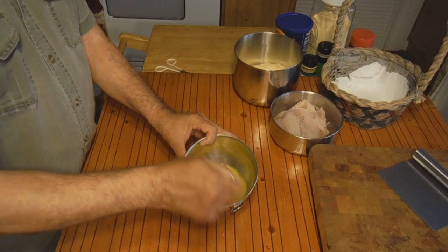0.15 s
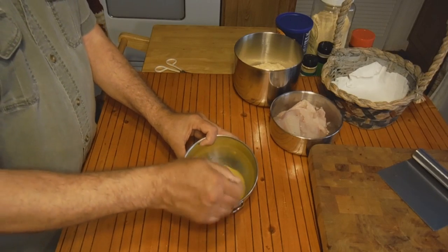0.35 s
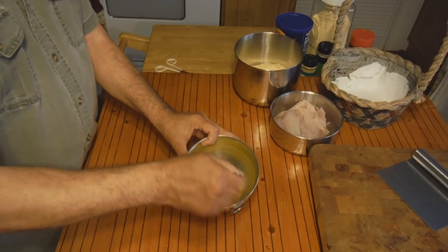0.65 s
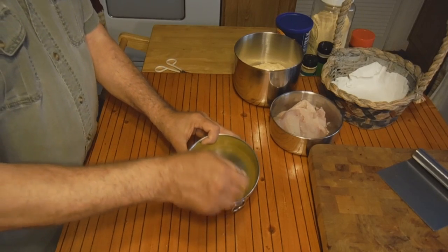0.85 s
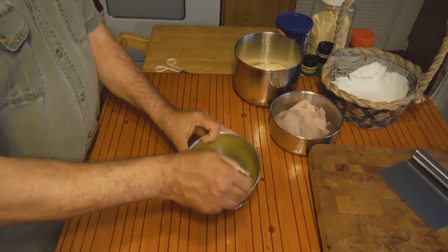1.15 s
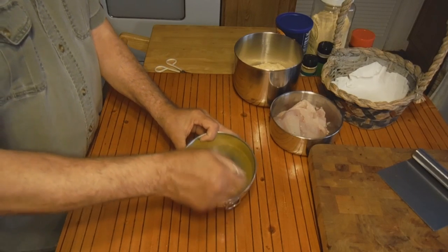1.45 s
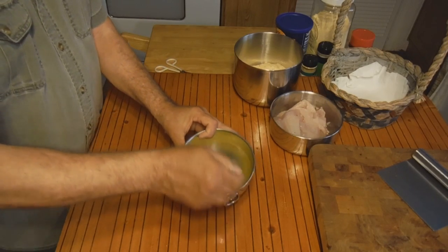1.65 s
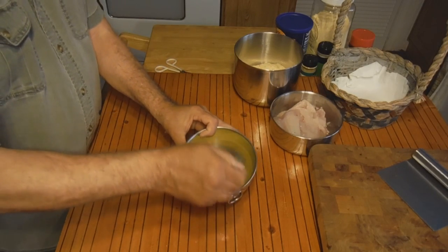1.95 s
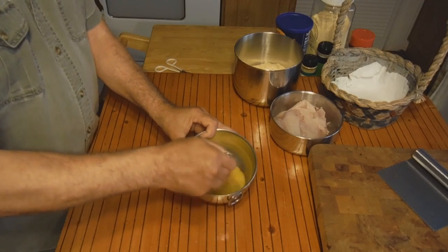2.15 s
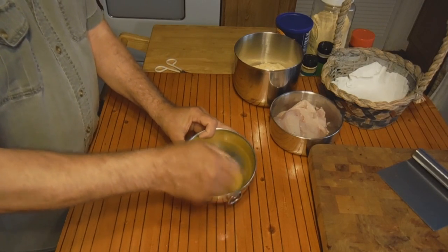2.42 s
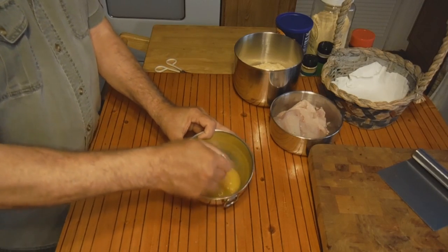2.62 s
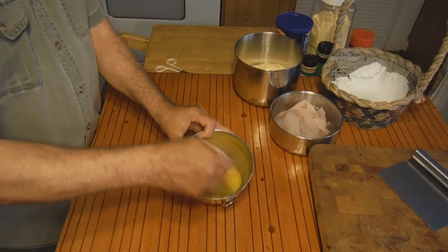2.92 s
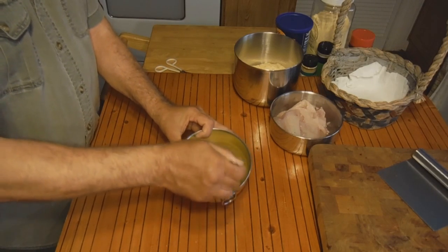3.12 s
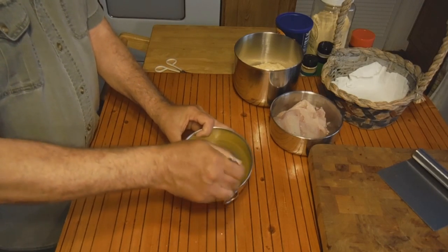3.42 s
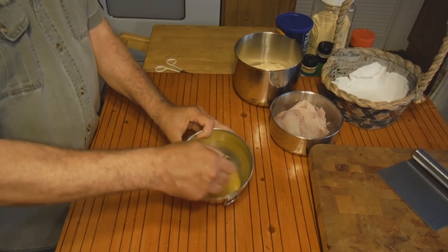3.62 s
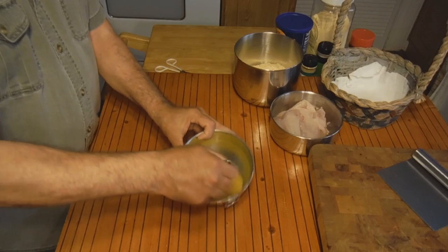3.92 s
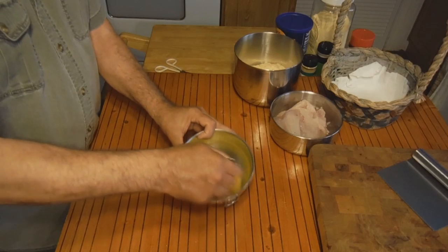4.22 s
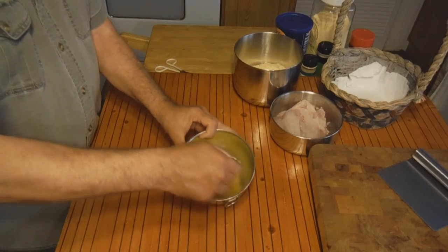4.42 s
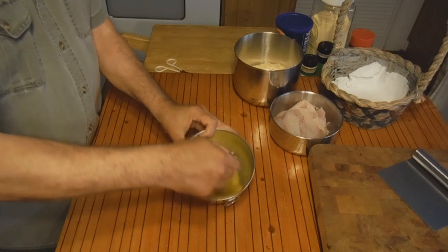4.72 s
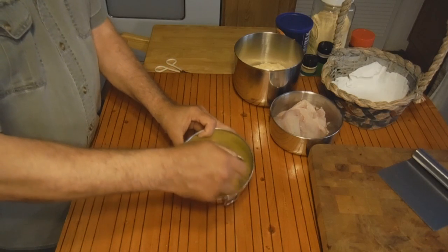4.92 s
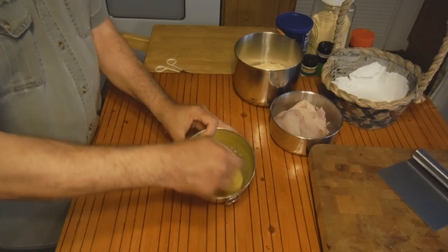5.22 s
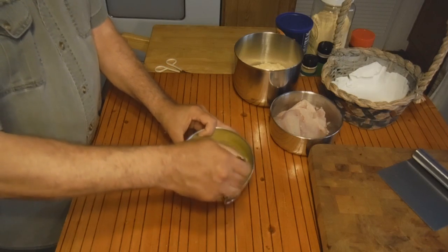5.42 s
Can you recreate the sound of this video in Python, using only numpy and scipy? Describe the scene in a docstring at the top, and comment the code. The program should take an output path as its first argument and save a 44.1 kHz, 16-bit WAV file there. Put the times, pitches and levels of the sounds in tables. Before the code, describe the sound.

Eggs are beaten with a metal fork in a small steel bowl on a wooden table, already in full swing at 0 s and continuing to the end at about 5.5 s. Around six times a second the tines hit and skid along the wall: a bright, short, rough clank with a choked mid-high ring, followed by two lighter, wet taps. At first the sound is drier and more metallic, with uneven force; strokes near 1.8 s and 5.1 s almost drop out. Low soft bumps of bowl on table fall around 0.7-1.2 s, strongest at 1.0 s, and again at 4.05 and 4.35 s. From 1.5 s the egg sloshes more, wettest at 2.6-3.4 s, with plops, tiny bubbles, spatter and a hollow hum from the bowl's floor; it eases, then thickens again towards the end. Close microphone, small kitchen, short dense echoes, faint steady air hush.

```python
"""Beating eggs in a steel bowl

Eggs are beaten with a fork in a small steel bowl held on a wooden kitchen table.
About six times a second the tines strike and skid along the wall (noise filtered by the bowl's modes),
then tap twice more on their way round through the egg (ringing tines, wet plops of banded noise and bubbles).
The deeper the fork digs, the more the egg sloshes (crowded noise bursts) and the bowl's floor hums (damped
sines); the table thuds now and then (a push and low modes), and a small room answers with dense echoes."""
import sys
import numpy as np
from scipy import signal
from scipy.fft import rfft, irfft
from scipy.io import wavfile

SR = 44100
rng = np.random.default_rng(int(sys.argv[2]) if len(sys.argv) > 2 else 0)


def waveform_to_disk(signal):
    """Save audio, clipped to [-1, 1], as 16-bit WAV at the path in sys.argv[1]."""
    frames = np.transpose(np.atleast_2d(signal))
    scaled = np.clip(frames, -1, 1) * 32767
    samples = np.round(scaled).astype(np.int16)
    wavfile.write(sys.argv[1], SR, samples)


N = 244971

# the fork strikes the wall, one row a stroke: (time [s], level [dB], wall ring relative to that level [dB])
STRIKES = [(0.1251, -8, -10.5), (0.298, -7.5, -11.5), (0.4719, -20, -6.5), (0.6345, -13, -4),
           (0.8021, -18, -4.5), (0.952, -11.5, -6.5), (1.114, -13.5, -7), (1.2787, -10.5, -4.5),
           (1.4357, -8.5, -9), (1.598, -9.5, -14), (1.7689, -42, -7), (1.9132, -19.5, -36),
           (2.064, -13.5, -9), (2.2046, -6.5, -9.5), (2.3633, -21.5, -7.5), (2.4925, -5, -9),
           (2.6502, -14.5, -5.5), (2.7991, -13, -6.5), (2.9371, -6, -9), (3.0978, -6.5, -19),
           (3.244, -4, -23), (3.3956, -6.5, -17.5), (3.532, -7.5, -8), (3.682, -8, -9.5),
           (3.8263, -8, -8.5), (3.9738, -10, -10), (4.1263, -6, -14.5), (4.2863, -8, -5.5),
           (4.439, -6.5, -9), (4.5978, -10.5, -3.5), (4.7513, -7.5, -5.5), (4.9121, -6, -9.5),
           (5.0767, -35, 4), (5.2243, -8, -5.5), (5.3929, -9, -8.5)]
# taps that stand out as the fork goes round:
# (time [s], level [dB], wet plop relative to that level [dB], plop pitch [Hz])
TAPS = [(0.0098, -15.5, -5.5, 2174), (0.1807, -15, -8, 1860), (0.3415, -15.5, -9, 1970),
        (0.3686, -18, -4, 1804), (0.509, -20, -9.5, 2130), (0.5432, -21, -9.5, 2230),
        (0.6688, -17, -8.5, 1900), (0.7084, -19.5, -14, 2250), (0.8348, -18.5, -4, 1660),
        (0.8596, -17.5, -1, 1910), (0.9903, -23, 1, 1860), (1.0169, -20.5, -5, 2485),
        (1.1439, -19, -2.5, 2000), (1.186, -20.5, -9, 2280), (1.3066, -21, -2.5, 1700),
        (1.3454, -26, -9, 1800), (1.4741, -21.0, -3.5, 1600), (1.5103, -18, -4, 2186),
        (1.6362, -18, -8.5, 1780), (1.6642, -12.5, -12, 1930), (1.7031, -23.5, -35, 1850),
        (1.7869, -24.5, -5.5, 1690), (1.8186, -13, -11.5, 1705), (1.94, -22.5, -12, 1980),
        (1.9723, -13.5, -8, 1726), (2.0986, -18.5, -8, 2180), (2.1206, -12.5, -4.5, 1890),
        (2.2605, -18.5, -7, 2070), (2.2719, -15.5, -12, 2200), (2.3787, -22.5, -6, 2140),
        (2.539, -14, -9, 1870), (2.5639, -15.5, -0.5, 1957), (2.6816, -21.5, -8, 2070),
        (2.7117, -19, -2.5, 1960), (2.836, -21, -0.5, 2340), (2.86, -15, -1, 1914), (2.9883, -13, -9, 1990),
        (3.0108, -13.5, -3.5, 1895), (3.1525, -10.5, -6.5, 1670), (3.2829, -17.5, -8, 2140),
        (3.3019, -11.5, -15, 2050), (3.432, -15.5, -11.5, 2200), (3.4595, -18.5, -13, 2070),
        (3.5662, -17, -8, 1970), (3.7264, -16.5, -5, 1840), (3.869, -16, -4.5, 1900),
        (4.0225, -17.5, 0.5, 1995), (4.0603, -16.5, -7, 1863), (4.1725, -18.0, -2.5, 1640),
        (4.1953, -17, -3.5, 1620), (4.327, -20, -0.5, 1900), (4.4788, -12.5, -6.5, 1910),
        (4.6366, -22, -1.5, 1882), (4.7941, -14.5, -9, 1430), (4.829, -18, -4, 2100),
        (4.9841, -19, 1.5, 1797), (5.1016, -22.0, -3.5, 2070), (5.1471, -23, -8, 1820),
        (5.272, -21, -0.5, 1730), (5.3066, -20.5, -13, 1780), (5.439, -22, 0.5, 1975),
        (5.4675, -17, -9, 1955)]
# the bowl rocks on the table: (time [s], level [dB])
THUDS = [(0.2255, -30.5), (0.7183, -29), (0.880, -24.5), (1.026, -15), (1.192, -20), (4.0502, -14),
         (4.360, -17)]
# how deep the fork digs into the egg: (time [s], depth relative to full depth [dB])
FORK_DEPTH = [(0, -19.5), (1.45, -8), (1.8, -5), (2.15, -6.5), (2.35, -12.5), (2.55, -3.5), (3.3, -1),
              (3.6, -11), (4.25, -10.5), (4.7, -8.5), (5.0, -7.5), (5.55, -5)]
# spectrum of steel on steel: (frequency [Hz], level [dB])
STEEL_SPECTRUM = [(40, -37), (250, -22), (480, -8.5), (720, -15.5), (1300, -13.5), (2200, -8), (3100, -6.5),
                  (4600, 1), (6400, 4), (7600, 3), (9500, 2), (12000, 0.5), (14000, -8.5), (16000, -14.5)]
# modes of the bowl, damped by hand and egg: (frequency [Hz], level [dB], t60 [s])
BOWL_MODES = [(893, 11.5, 0.097), (1266, 10, 0.12), (1840, 16, 0.028), (2260, -11, 0.57), (2648, 5, 0.085),
              (3520, 1.5, 0.062), (3762, 3, 0.053), (4320, -6, 0.037), (4507, -4.5, 0.017),
              (4740, -2, 0.067), (5320, -9.5, 0.022), (5650, -8, 0.011), (6350, -16, 0.017),
              (6290, -3.5, 0.093), (8580, -1, 0.036), (9030, 6, 0.014), (9660, 2, 0.02),
              (10800, -20, 0.0067), (11540, -14.5, 0.014)]
# modes of the table: (frequency [Hz], level [dB], t60 [s])
TABLE_MODES = [(69.3, -7, 0.2), (94.7, -1.5, 0.085), (149, 0.5, 0.11), (193.7, -10.5, 0.19),
               (214.7, 0.5, 0.082), (289, -25, 0.59), (381.6, -11.5, 0.12), (447, -24, 0.58)]
# modes of the bowl's floor under the egg: (frequency [Hz], level [dB], t60 [s])
FLOOR_MODES = [(440, -2.5, 0.13), (497, 1, 0.12), (713, -7, 0.036), (899.7, 3.5, 0.15)]
# spectrum of the wet egg: (frequency [Hz], level [dB])
EGG_SPECTRUM = [(100, -21.5), (300, 2.5), (450, -11.5), (900, 5.5), (1600, -10), (2400, 2), (3300, -4.5),
                (6000, 12), (10000, 11.5), (16000, -8)]
# spectrum of the dull knock of the bowl's foot: (frequency [Hz], level [dB])
KNOCK_SPECTRUM = [(40, -9), (150, 1), (350, -17), (650, -2.5), (760, -7.5), (860, 3), (1050, -10),
                  (1600, -18), (16000, -70)]
# decay of the kitchen's reverberation: (frequency [Hz], t60 [s])
ROOM_T60 = [(100, 0.24), (800, 0.24), (2000, 0.35), (5500, 0.22), (10000, 0.21), (15000, 0.2648)]
# strength of the kitchen's answer: (frequency [Hz], level [dB])
ROOM_SPECTRUM = [(100, -3), (450, -11.5), (950, -2.5), (1800, -12.5), (2700, -3), (5500, -4), (9000, -5),
                 (14000, -6)]
# spectrum of the still air in the kitchen: (frequency [Hz], level [dB])
AIR_SPECTRUM = [(25, 11), (70, -17.5), (200, -11.5), (500, -10), (1500, -19.5), (6000, -2), (15000, -24.5)]

AIR_DB = -44.5
EDGE_HZ = 15800  # upper band limit
SKID_S = 0.00493  # skid time as the wall ring vanishes; the more the wall rings, the longer the skid
FIRST_BITE, BITE_S = 0.52, 0.00053  # the tines' first bite on the wall, as a share of the skid, and its decay
# treble tilt of an ordinary strike, and its loss per dB of extra force
STRIKE_BRIGHT_DB, DULL_PER_DB = -5.5, 0.16
ORDINARY_DB = -11  # level of an ordinary strike
MUFFLE_PER_DB = 0.206  # treble lost per dB of depth in the egg
PURITY_PER_DB = 0.35  # a weak wall ring is more clank than tone (dB of tone per dB of ring)
# otherwise the fork just grazes the bowl, twice a stroke: delays after the strike
GRAZE_LAGS_S, GRAZE_JITTER_S = (0.042, .076), .003
GRAZE_DB, GRAZE_SPREAD_DB, GRAZE_WET_DB, GRAZE_PLOP_HZ = -25, -0.5, -7.5, 1970
TINE_HZ, TINE_SPREAD = 5580, 0.23  # each tap rings a tine at another pitch (spread as a share)
TAP_BRIGHT_DB, TAP_BRIGHT_SPREAD_DB = -2.5, 2.5
CHURN_DB, CHURN_PER_DB = -24.5, 1.88  # gain of wet sounds at full depth, and how it follows the depth
BEARING_DB, BEARING_PER_DB = -28.5, 0.86  # the same for the tines bearing on the floor of the bowl
STROKE_S = 0.167  # the beating is already under way: one stroke began this long before the first strike
BOTTOM_S, BOTTOM_WIDTH_S = 0.0608, 0.016  # the tines pass over the bowl's floor this long after a strike
SIDE_S, SIDE_WIDTH_S, SIDE_HZ = 0.039, 0.0089, 1273  # before that they meet the far wall, of lower note
SPARED_PER_DB = 0.29  # force that a stroke spares the wall goes into the floor (dB per dB)

BLOW_SIZE, HEAD_S = 8192, .008  # samples in one blow, and the opening over which its rms is set
T, F = np.arange(BLOW_SIZE) / SR, np.fft.rfftfreq(BLOW_SIZE, 1 / SR)  # time and frequency axes of one blow
SCENE_T, SCENE_F = np.arange(N) / SR, np.fft.rfftfreq(N, 1 / SR)  # the same for the whole scene


def amp(db):
    """Logarithmic level: decibels to amplitude gain."""
    return 10 ** (np.asarray(db) / 20)


def evened(x, span=None):
    """Effective value: scales to rms 1, over the whole sound or over its first span seconds."""
    head = x if span is None else x[:round(span * SR)]
    return x / np.sqrt(np.mean(head ** 2) + 1e-20)


def read(points, hz):
    """Logarithmic pitch: interpolates a table on a log-frequency axis."""
    f, value = np.transpose(points)
    return np.interp(np.log(hz + 1), np.log(f + 1), value)


def add(mix, s, sound):
    """Superposition: adds a sound into the mix at time s."""
    part = mix[max(round(s * SR), 0):][:len(sound)]
    part += sound[:len(part)]


def resonance(f, hz, width_hz):
    """Resonance: complex response of one mode, gain 1 at its centre."""
    return 1 / (1 + 2j * (f - hz) / width_hz)


def body(f, modes):
    """Modal superposition: a body passes a blow on and rings with its modes."""
    # a mode's bandwidth is 2.2 / t60
    return 1 + sum(amp(db) * resonance(f, hz, 2.2 / t60) for hz, db, t60 in modes)


def causal(db):
    """Causality: a minimum-phase response with the given gains, so nothing sounds before the blow."""
    cepstrum = irfft(np.log(amp(db)))
    half = len(cepstrum) // 2
    cepstrum[1:half] *= 2
    cepstrum[half + 1:] = 0
    return np.exp(rfft(cepstrum))


def band(envelope, hz, width_hz):
    """Selective filtering: a noise burst through one steep resonance, rms 1 over its start."""
    burst = rfft(rng.standard_normal(BLOW_SIZE) * envelope)
    return evened(irfft(burst * resonance(F, hz, 2 * width_hz) ** 2), HEAD_S)


def bubble(hz, life, glide):
    """Bubble resonance: a pocket of air rings and shifts pitch as the egg folds over it."""
    turns = np.cumsum(hz * (1 + glide * np.tanh(T / life / 2))) / SR
    return np.sin(2 * np.pi * turns) * (1 - np.exp(-4 * T / life)) * np.exp(-T / life)


def bowl(place_db=5.5, load=0.016):
    """Modal excitation: each contact's spot shares out the modes anew; the moving egg's load detunes them."""
    chance = rng.standard_normal((len(BOWL_MODES), 2)).clip(-1.5, 1.5)
    modes = [(hz * (1 + load * detune), db + place_db * share, t60)
             for (hz, db, t60), (share, detune) in zip(BOWL_MODES, chance)]
    return body(F, modes)


def clink(grip, response, bright_db):
    """Contact excitation: noise chatters on the steel during the grip; bright_db tilts the treble up or down."""
    chatter = rng.standard_normal(BLOW_SIZE) * grip
    tilt_db = bright_db * np.tanh(np.log((F + 1) / 7500) / 0.35) / 2
    colour = causal(read(STEEL_SPECTRUM, F) + tilt_db)
    return evened(irfft(rfft(chatter) * response * colour), HEAD_S)


def depth(s):
    """Immersion: depth of the fork in the egg at time s, in dB."""
    return np.interp(s, *np.transpose(FORK_DEPTH))


def churn():
    """Immersion drives agitation: gain of the wet sounds at every sample."""
    return amp(CHURN_DB + CHURN_PER_DB * depth(SCENE_T))


def starts():
    """Repeated strokes: when each one begins."""
    return [STRIKES[0][0] - STROKE_S] + [row[0] for row in STRIKES]


def passing(s, lag, width):
    """Cyclic motion: a bell curve peaks as the fork passes a given point of each stroke."""
    return sum(np.exp(-((s - start - lag) / width) ** 2) for start in starts())


def air():
    """Stationary noise: a faint steady hush of filtered random pressure."""
    hush = irfft(rfft(rng.standard_normal(N)) * amp(read(AIR_SPECTRUM, SCENE_F)), N)
    return amp(AIR_DB) * evened(hush)


def room(x, first=.004, drift_hz=2.128, count=4):
    """Reverberation: dense reflections die by band, and shift as arm and bowl move."""
    t, out = np.arange(SR // 2) / SR, np.zeros(N)
    for k in range(count):
        sparse = rng.standard_normal(len(t)) * (rng.random(len(t)) < 4000 / SR)  # 4000 echoes a second
        hz, when, z = signal.stft(sparse * (t > first), SR, nperseg=128)
        z = z * amp(-60 * when / read(ROOM_T60, hz)[:, None])
        energy = np.linalg.norm(signal.istft(z, SR)[1])  # before colouring
        tail = signal.istft(z * amp(read(ROOM_SPECTRUM, hz))[:, None], SR)[1] / energy
        # staggered cosines fade between the tails at constant total power
        turn = np.cos(np.pi * (drift_hz * SCENE_T + k / count)) * np.sqrt(2 / count)
        out += signal.oaconvolve(x * turn, tail)[:N]
    return out


def cupboard(x, delay=0.0087, level_db=-15):
    """Specular reflection: one distinct early echo from a nearby hard surface."""
    out = np.zeros(N)
    add(out, delay, amp(level_db) * x)
    return out


def thuds(push=0.00091, push_db=1, ring_db=0, swell=0.0037, knock_db=-13, knock_t60=0.19,
          echo=0.041, echo_hz=255, echo_db=-9):
    """Impulse response: a soft push and release, a rough knock, the table's low modes, a short echo off a wall."""
    out, u = np.zeros(N), T / push - 1.6
    blow = -2 * u * np.exp(-u ** 2)
    onset = 1 - np.exp(-T / swell)
    ring = sum(amp(db - 60 * T / t60) * np.cos(2 * np.pi * hz * T) for hz, db, t60 in TABLE_MODES)
    thud = amp(push_db) * blow + amp(ring_db) * ring * onset
    settle = np.sin(2 * np.pi * echo_hz * T) * onset * np.exp(-T / 0.013)
    knock_envelope = amp(knock_db - 60 * T / knock_t60) * onset
    for s, db in THUDS:
        noise = rfft(rng.standard_normal(BLOW_SIZE))
        knock = evened(irfft(noise * amp(read(KNOCK_SPECTRUM, F))))
        add(out, s, amp(db) * (thud + knock * knock_envelope))
        add(out, s + echo, amp(db + echo_db) * settle)
    return out


def foot(level_db=-8, length=0.00017, bright_db=-12):
    """Brief impact: the steel foot of the bowl clicks as it lands on the table."""
    out = np.zeros(N)
    for s, db in THUDS:
        add(out, s, amp(db + level_db) * clink(np.exp(-T / length), bowl(), bright_db))
    return out


def slosh(level_db=-3, lag=0.048, width=0.018, rest=0.017):
    """Granular turbulence: tiny wet bursts crowd together as the fork ploughs through after each strike."""
    plough = rest + passing(SCENE_T, lag, width)
    bursts = rng.standard_normal(N) * (rng.random(N) < 7000 / SR) * plough  # 7000 bursts a second
    wet = irfft(rfft(bursts) * amp(read(EGG_SPECTRUM, SCENE_F)), N)
    return amp(level_db) * evened(wet) * churn()


def bubbles(lo_hz, hi_hz, level_db, life, lag, spread, count):
    """Entrained air: each stroke folds a few ringing pockets into the egg."""
    out = np.zeros(N)
    for row in STRIKES:
        for when, pitch, faintness, glide in rng.random((count, 4)):
            pocket = bubble(lo_hz * (hi_hz / lo_hz) ** pitch, life, .14 * (glide - .6))
            add(out, row[0] + lag + spread * when, amp(level_db - 10 * faintness) * pocket)
    return out * churn()


def spatter(peak_per_s=260, level_db=17, lag=0.028, width=0.014):
    """Film rupture: films of egg snap off the tines in separate tiny ticks."""
    lifting = passing(SCENE_T, lag, width)
    ticks = rng.standard_normal(N).clip(-2, 2) * (rng.random(N) < lifting * peak_per_s / SR)
    return amp(level_db) * irfft(rfft(ticks) * amp(read(STEEL_SPECTRUM, SCENE_F)), N) * churn()


def bottom_taps(contacts, elsewhere=.25):
    """Division of force: the share of each tap that goes into the bowl's floor, as (time [s], level [dB])."""
    shares = []
    for s, db, *_ in contacts:
        strike_db = min(STRIKES, key=lambda row: abs(s - BOTTOM_S - row[0]))[1]
        spared = amp(SPARED_PER_DB * (ORDINARY_DB - strike_db))
        landing = passing(s, BOTTOM_S, BOTTOM_WIDTH_S) * spared
        shares.append((s, db + 20 * np.log10(elsewhere + landing)))
    return shares


def hollow(contacts, level_db, glide=0.0092, settle=.04):
    """Loaded modes: deep blows also sound the floor of the bowl, detuned by the shifting egg."""
    out = np.zeros(N)
    for s, db, *_ in contacts:
        detune = rng.uniform(.96, 1.04) + glide * rng.standard_normal() * np.exp(-T / settle)
        elapsed = np.cumsum(detune) / SR
        ring = sum(amp(mode_db - 60 * T / t60) * np.sin(2 * np.pi * (hz * elapsed + rng.random()))
                   for hz, mode_db, t60 in FLOOR_MODES)
        bearing_db = BEARING_DB + BEARING_PER_DB * depth(s)
        add(out, s, amp(level_db + db + bearing_db) * ring * (1 - np.exp(-T / 0.0007)))
    return out


def drag(level_db=-31, per_depth=0.12, lag=0.054, width=0.032, per_s=600, bright_db=-4):
    """Stick-slip friction: between the taps the tines scrape over the bowl in a run of tiny slips."""
    touching = passing(SCENE_T, lag, width)
    slips = rng.standard_normal(N) * (rng.random(N) < per_s / SR)
    tilt_db = bright_db * np.log2((SCENE_F + 500) / 7500).clip(0, None)  # per octave, in the treble only
    colour = amp(read(STEEL_SPECTRUM, SCENE_F) + tilt_db)
    scrape = evened(irfft(rfft(slips) * colour * body(SCENE_F, BOWL_MODES), N))
    return scrape * touching * amp(level_db + per_depth * depth(SCENE_T))


def flicks(level_db=-33, spread_db=3, lag=.088, spread=0.031, length=.0007, bright_db=0):
    """Release transient: as the fork lifts clear late in each stroke, it gives off one tiny dry tick."""
    out = np.zeros(N)
    for s, *_ in STRIKES:
        tick = clink(np.exp(-T / length), bowl(), bright_db)
        add(out, s + lag + spread * rng.random(), amp(level_db + spread_db * rng.standard_normal()) * tick)
    return out


def grazes(clear=.022):
    """Light contact: rows like TAPS at the usual places in each stroke, wherever no firmer tap falls."""
    due = [s + lag for s, *_ in STRIKES for lag in GRAZE_LAGS_S]
    rows = []
    for s, (late, force, pitch) in zip(due, rng.standard_normal((len(due), 3))):
        if min(abs(s - row[0]) for row in TAPS) > clear:
            rows.append((s + GRAZE_JITTER_S * late, GRAZE_DB + GRAZE_SPREAD_DB * force,
                         GRAZE_WET_DB, GRAZE_PLOP_HZ * np.exp(0.082 * pitch)))
    return rows


def far_wall(contacts, level_db=-7, width_hz=110, rise=0.00067, decay=0.0042):
    """Local resonance: taps early in a stroke draw a short, lower note from the far wall."""
    out = np.zeros(N)
    swell = (1 - np.exp(-T / rise)) * np.exp(-T / decay)
    for s, db, wet_db, _ in contacts:
        nearness = passing(s, SIDE_S, SIDE_WIDTH_S)
        add(out, s, amp(level_db + db + wet_db) * nearness * band(swell, SIDE_HZ, width_hz))
    return out


def taps(contacts, level_db=-1.13, plop_db=-5.5, bubble_db=0, life=0.0068, tine_db=6, tine_width_hz=800,
         plop_width_hz=480, length=0.0043, close_s=.004, wet_close_s=0.0059):
    """Impact and cavity closure: short taps ring a tine, and the egg closes behind it with a plop."""
    out = np.zeros(N)
    grip = (1 - np.exp(-T / 0.0001)) * np.exp(-(T / length) ** 2)
    chance = rng.standard_normal((len(contacts), 2))
    for (s, db, wet_db, plop_hz), (pitch, bright) in zip(contacts, chance):
        tine = 1 + amp(tine_db) * resonance(F, TINE_HZ * np.exp(TINE_SPREAD * pitch), tine_width_hz)
        pocket = evened(bubble(plop_hz, life, rng.uniform(-.15, .1)), HEAD_S)
        decay_s = close_s + wet_close_s * amp(wet_db)  # wetter plops last longer
        closing = (1 - np.exp(-T / 0.0008)) * np.exp(-T / decay_s)
        plop = band(closing, plop_hz, plop_width_hz) + amp(bubble_db) * pocket
        tap = clink(grip, bowl() * tine, TAP_BRIGHT_DB + TAP_BRIGHT_SPREAD_DB * bright)
        add(out, s, amp(db) * (amp(level_db) * tap + amp(plop_db + wet_db) * plop))
    return out


def strikes(level_db=-1.24, wall_db=0, wall_hz=1840, tone_db=2, clank_db=-5, clank_hz=1720,
            clank_width_hz=420, rise=0.00044):
    """Friction-driven resonance: each strike skids and pumps the wall's main mode, which the egg chokes."""
    out = np.zeros(N)
    swell = (1 - np.exp(-T / 0.0013)) * np.exp(-(T / 0.0047) ** 4) + 0.013 * np.exp(-T / .014)
    for s, db, ring_db in STRIKES:
        skid_s = SKID_S * (1 + amp(ring_db))
        skid = (1 - np.exp(-T / rise)) * np.exp(-(T / skid_s) ** 3)
        grip = skid + FIRST_BITE * np.exp(-T / BITE_S)
        bright_db = STRIKE_BRIGHT_DB - DULL_PER_DB * (db - ORDINARY_DB) - MUFFLE_PER_DB * depth(s)
        hz = wall_hz * (1 + .018 * rng.standard_normal())
        tone = evened(swell * np.sin(2 * np.pi * hz * T), HEAD_S)
        clank = band(swell, clank_hz, clank_width_hz)
        wall = amp(tone_db + PURITY_PER_DB * ring_db) * tone + amp(clank_db) * clank
        contact = amp(level_db) * clink(grip, bowl(), bright_db)
        add(out, s, amp(db) * (contact + amp(wall_db + ring_db) * wall))
    return out


def fork(contacts):
    """Directional radiation: strikes and taps as they leave the bowl in one direction."""
    return strikes() + taps(contacts) + far_wall(contacts)


def scene():
    """Superposition of sources and reflections: fork, egg and table in the kitchen."""
    contacts = list(TAPS) + grazes()
    squelch = bubbles(lo_hz=1203, hi_hz=2680, level_db=12, life=0.0069, lag=0.028, spread=0.036, count=3)
    gurgle = bubbles(lo_hz=664, hi_hz=1012, level_db=-1, life=0.013, lag=.02, spread=.1, count=5)
    hum = hollow(STRIKES, level_db=-3) + hollow(bottom_taps(contacts), level_db=8.5)
    egg = slosh() + spatter() + squelch + gurgle
    rest = egg + drag() + flicks() + hum + thuds() + foot()
    # the bowl sends one mixture of its modes to the microphone and another to the walls
    direct = fork(contacts) + rest
    outward = fork(contacts) + rest
    return (direct + cupboard(outward) + room(outward) + air())[None]


def record(dry, ceiling=0.92, low_cut_hz=48):
    """Transduction: the microphone drops deep bass and overloads softly; then the band limit."""
    high_pass = signal.butter(4, low_cut_hz, "highpass", fs=SR, output="sos")
    thin = signal.sosfilt(high_pass, dry)
    squashed = thin / (1 + (thin / ceiling) ** 6) ** (1 / 6)
    low_pass = signal.firwin(255, EDGE_HZ, window=("kaiser", 8), fs=SR)
    return signal.oaconvolve(squashed, low_pass[None], "same")


dry = scene()
out = record(dry)
waveform_to_disk(out)
```